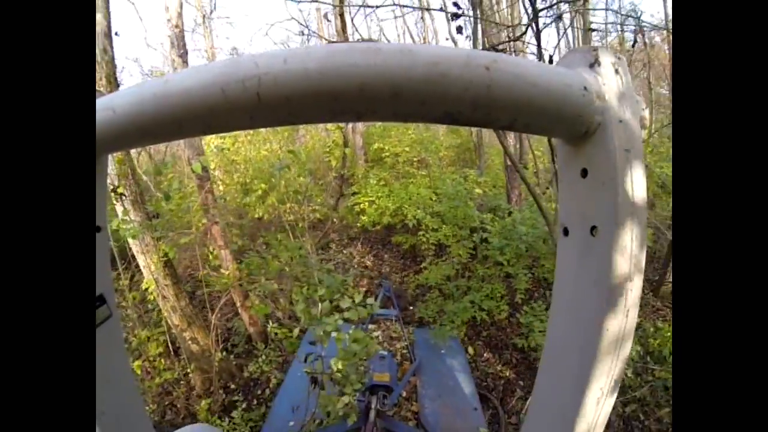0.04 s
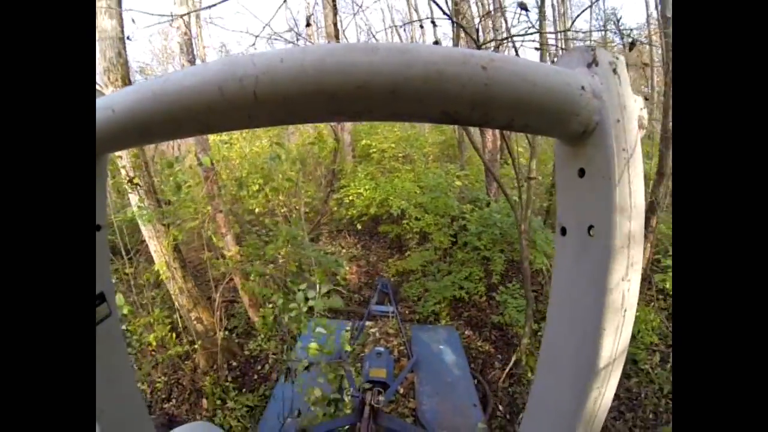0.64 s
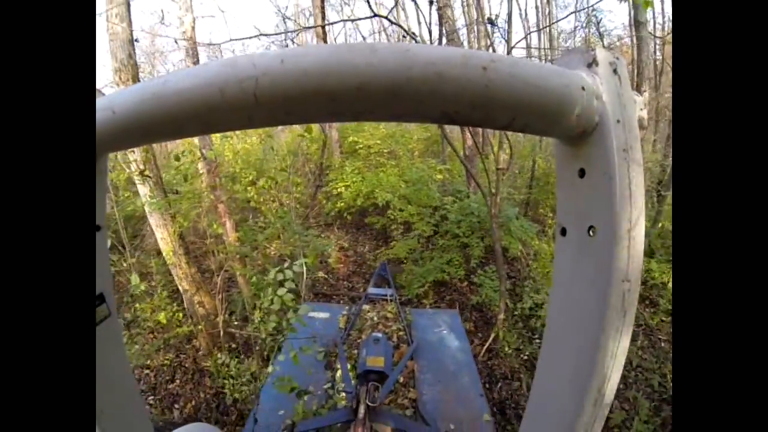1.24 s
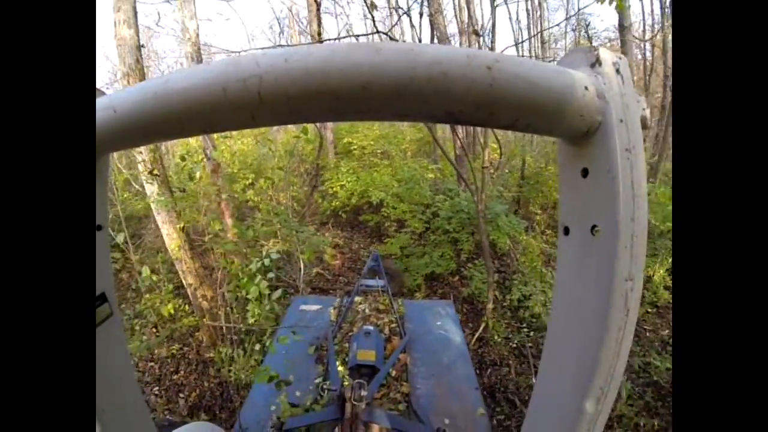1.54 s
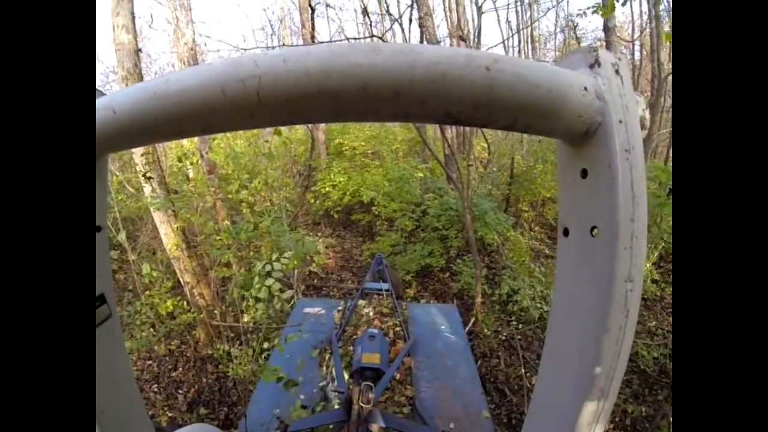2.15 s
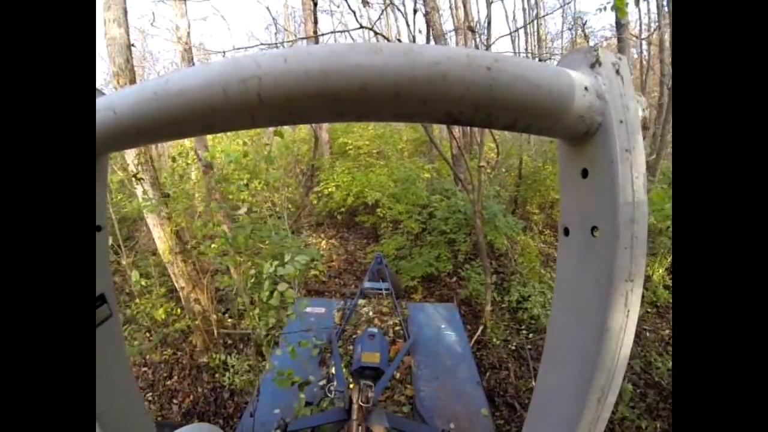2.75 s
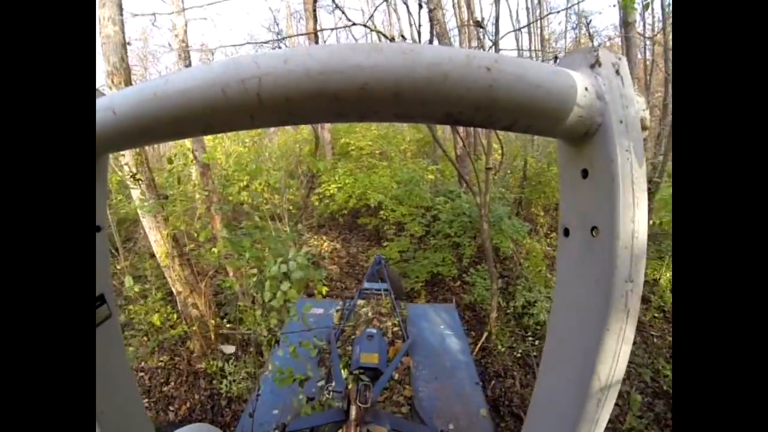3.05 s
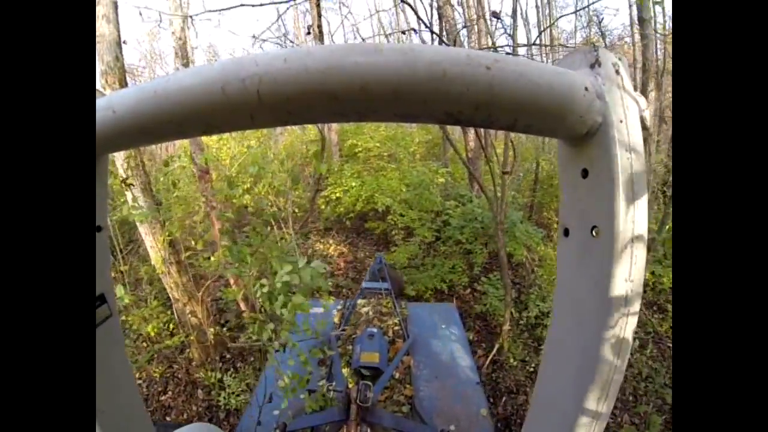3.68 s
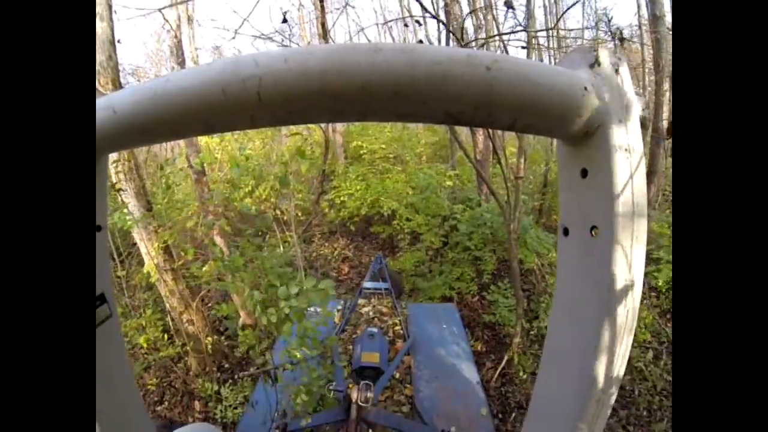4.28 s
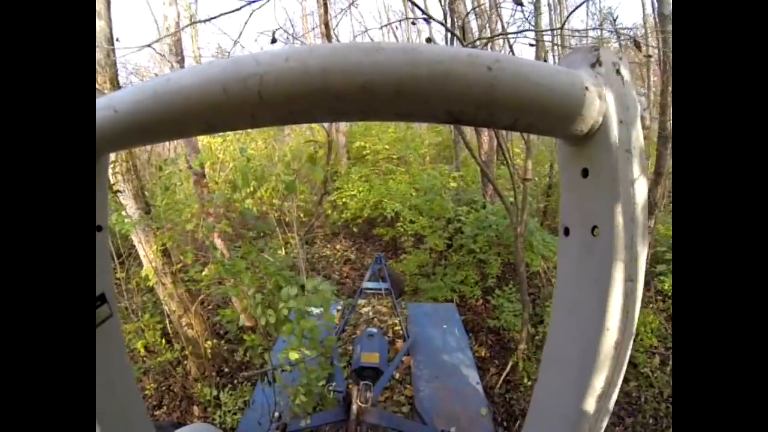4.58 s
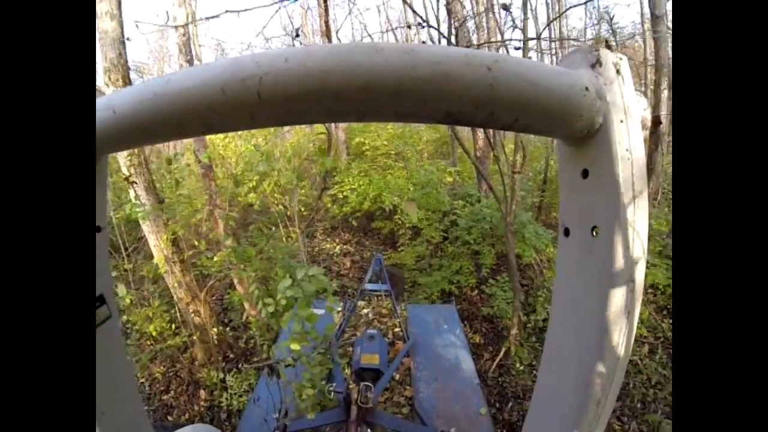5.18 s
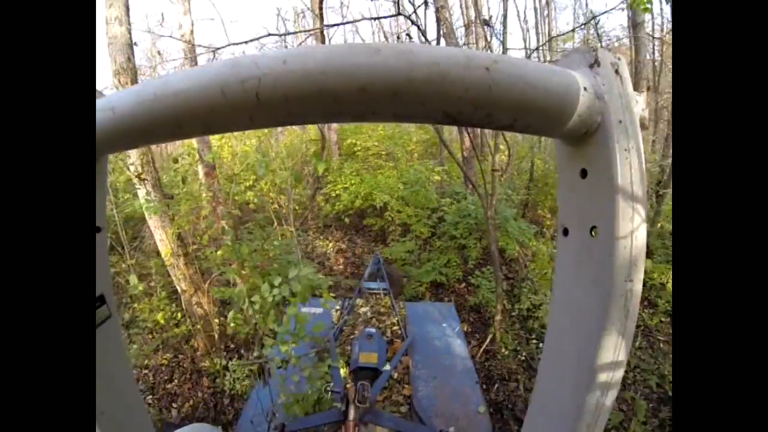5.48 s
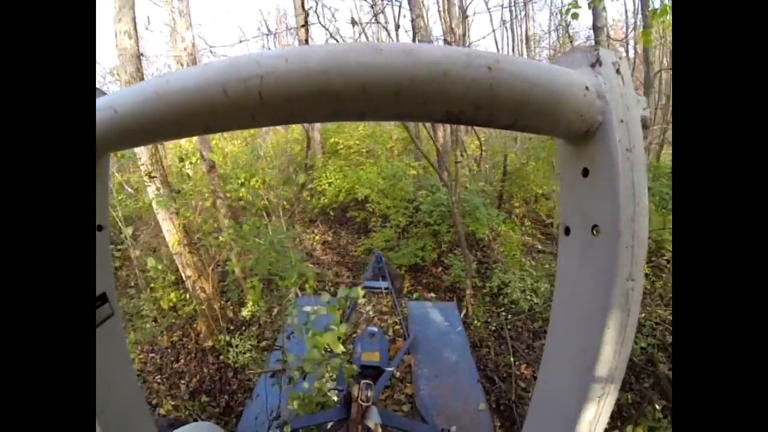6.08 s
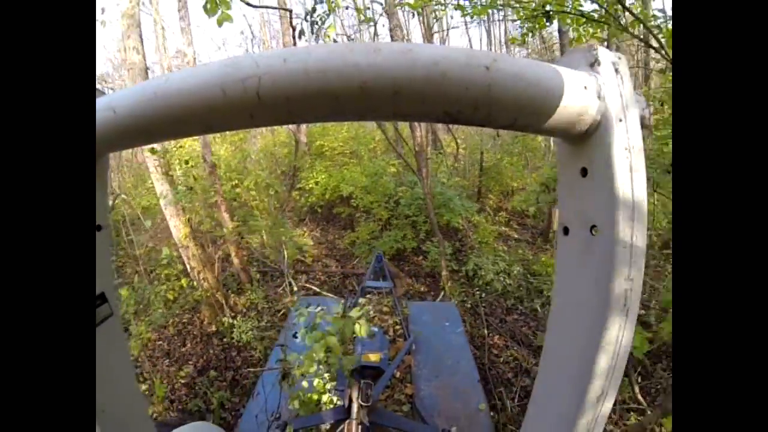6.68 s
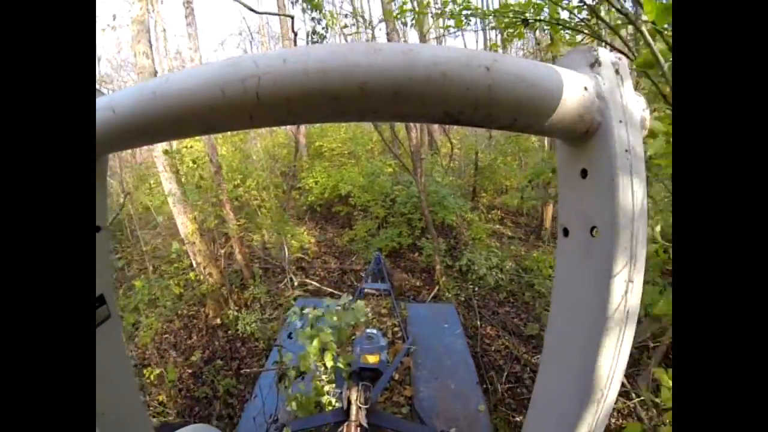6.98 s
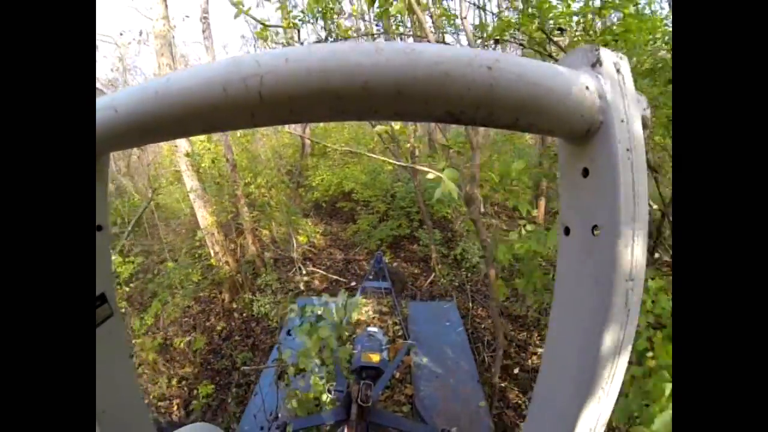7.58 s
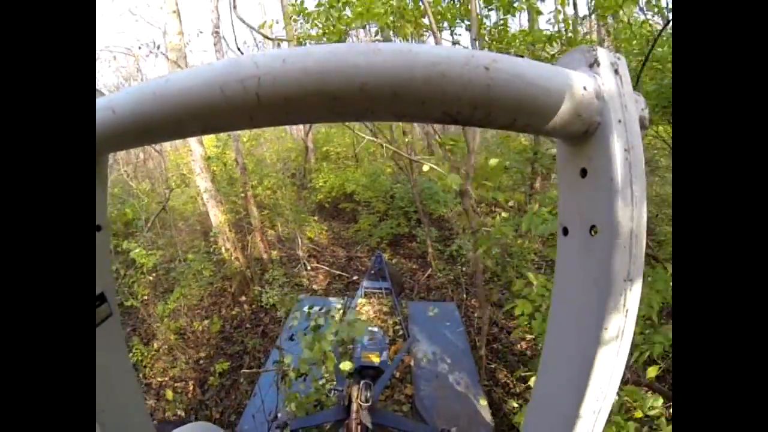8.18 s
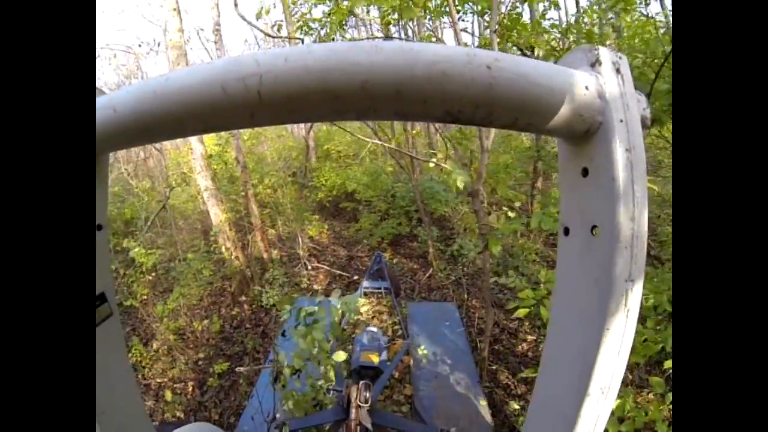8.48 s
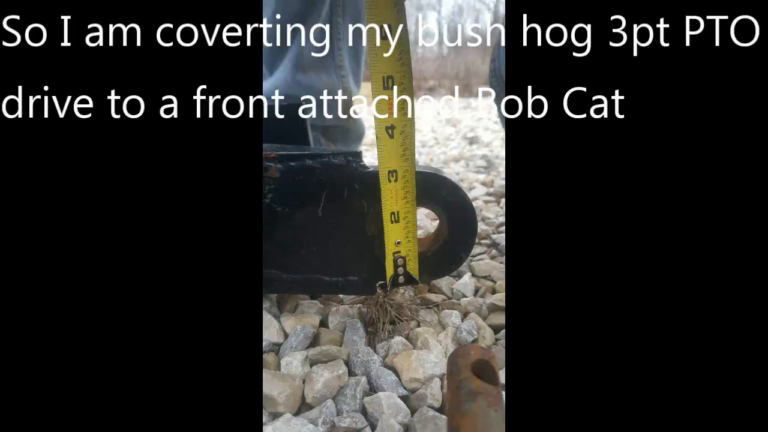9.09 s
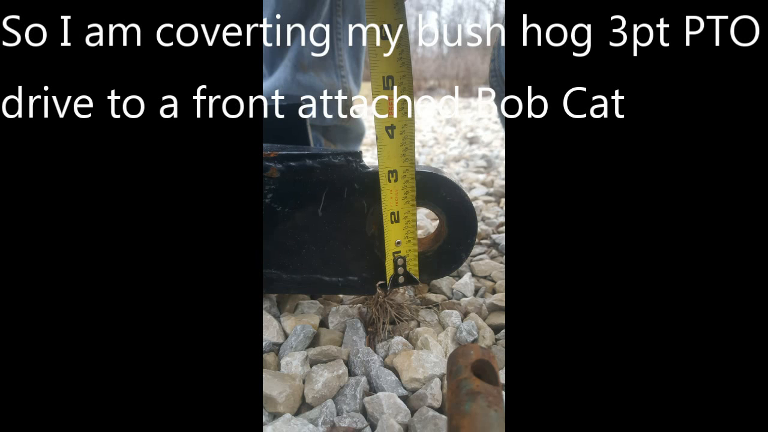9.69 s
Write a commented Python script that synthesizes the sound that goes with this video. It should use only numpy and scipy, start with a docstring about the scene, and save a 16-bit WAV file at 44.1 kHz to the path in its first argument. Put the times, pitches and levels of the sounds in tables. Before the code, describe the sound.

A rotary mower cuts and cracks through brush with steel clinks, driven by a stumbling, then faster loader engine.

```python
"""An engine pops and stumbles at low speed as a skid steer pushes a rotary mower into brush,
heard from the open cab. It picks up and runs on with frequent misfires; its fan and hydraulics hum.
The blades roar under the deck, shred stems in bursts and snap wood while loose steel clinks.
All sound stops abruptly."""
import sys
import numpy as np
from scipy import signal
from scipy.fft import rfft, irfft, next_fast_len
from scipy.io import wavfile
from scipy.ndimage import map_coordinates

SR = 44100
rng = np.random.default_rng(int(sys.argv[2]) if len(sys.argv) > 2 else 0)


def master_out(mix):
    """Clip the mix to full scale and print it as 16-bit PCM to the path in sys.argv[1]."""
    frames = np.transpose(np.atleast_2d(mix))
    ceiling = np.clip(frames, -1, 1)
    pcm = np.round(ceiling * 32767).astype(np.int16)
    wavfile.write(sys.argv[1], SR, pcm)


N = 433944
TIME = np.arange(N) / SR
CATCH_S, STOP_S = 2.383, 8.885  # engine catches; sound ends
THINNING_S = [1.27, 1.59]  # the opening thicket thins out over this span


def amp(db):
    """Decibels to gain."""
    return 10 ** (np.asarray(db) / 20)


def unit(x):
    """Scale to rms 1."""
    return x / np.sqrt(np.mean(x ** 2) + 1e-20)


def wobble(rate_hz):
    """Smooth random curve, rate_hz knots a second."""
    return map_coordinates(rng.standard_normal(int(N * rate_hz / SR) + 4), [TIME * rate_hz])


def gain(spectrum, hz):
    """Gain of (Hz, dB) points on a log axis."""
    points_hz, db = np.transpose(spectrum)
    return amp(np.interp(np.log(hz + 1), np.log(points_hz), db))


def filtered(x, response):
    """Apply a response given as a function of Hz."""
    size = next_fast_len(N + SR // 2)
    return irfft(rfft(x, size) * response(np.fft.rfftfreq(size, 1 / SR)), size)[:N]


def coloured(x, spectrum):
    """Filter by (Hz, dB) points; rms 1."""
    return unit(filtered(x, lambda hz: gain(spectrum, hz)))


def add(track, start_s, sound):
    """Mix a sound into the track."""
    start = round(start_s * SR)
    sound = sound[max(-start, 0):]
    part = track[max(start, 0):][:len(sound)]
    part += sound[:len(part)]


def crackle(rate_hz, spread_db):
    """Random clicks of uneven size; rms 1."""
    hits, size = rng.random(N) < rate_hz / SR, rng.standard_normal(N)
    return unit(hits * np.sign(size) * amp(spread_db * np.minimum(np.abs(size), 2)))


def hum(hz, drift_hz, waver_db):
    """Unsteady tone; rms 1."""
    return unit(amp(waver_db * wobble(25)) * np.sin(2 * np.pi * np.cumsum(hz + drift_hz * wobble(22)) / SR))


def swells(rows, floor_db, skew=1, steep=1):
    """Gain of (s, dB, half length s) swells; above 1, skew speeds the rise, steep squares the top."""
    t = TIME[::64]
    stretch = lambda u: np.minimum(np.maximum(-u * skew, u / skew) ** steep, 20)
    power = sum(amp(2 * db) / np.cosh(stretch((t - s) / half_s)) ** 2 for s, db, half_s in rows)
    return np.sqrt(np.interp(TIME, t, power) + amp(2 * floor_db))


def thud(width_s, boom_gain, boom_hz, t60_s, lead_s):
    """A pressure puff between two troughs, with the boom of the cab; peak at the middle."""
    t = np.arange(-(SR // 10), SR // 10) / SR
    puff = (1 - (t / width_s) ** 2) * np.exp(-.5 * (t / width_s) ** 2)
    boom = np.cos(2 * np.pi * boom_hz * t) * amp(-60 * np.abs(t) / np.where(t > 0, t60_s, lead_s))
    return (puff + boom_gain * boom) / (1 + boom_gain)


# Each row: time in seconds, engine firing rate in Hz.
FIRING_RATE = [(0, 33), (1.4, 32.8), (2.38, 39.04), (2.79, 44.02), (4.12, 43.51), (4.81, 43.91),
               (5.45, 39.81), (6.42, 42.85), (7.68, 41.39), (8.88, 42.33)]

def crankshaft():
    """Firing rate, and crank position in firings since the engine catches."""
    firing_hz = np.interp(TIME, *np.transpose(FIRING_RATE))
    crank = np.cumsum(firing_hz) / SR
    return firing_hz, crank - crank[round(CATCH_S * SR)]


# Each row: time of a hard exhaust pop in seconds, relative level in dB.
EXHAUST_POPS = [(.065, -1.5), (.316, -3), (.41, -2.5), (.44, -2), (0.505, -3), (0.532, -7.5), (0.625, -2),
                (.687, -5), (.807, -0.5), (0.93, -1), (.963, -2), (1.12, -2), (1.244, -3.5), (1.366, -4),
                (1.666, -3), (1.753, -1.5), (1.839, -.5), (1.896, -6), (1.979, 1), (2.008, -2.5),
                (2.063, 2.5), (2.088, -4), (2.144, -0.5), (2.167, -2.5), (2.33, -2)]

def pops(level_db=-3):
    """The stumbling engine fires in single hard thuds."""
    out = np.zeros(N)
    shape = thud(width_s=.0016, boom_gain=.51, boom_hz=113.7, t60_s=.04, lead_s=.029)
    for s, db in EXHAUST_POPS:
        add(out, s - len(shape) / 2 / SR, amp(db + level_db) * shape)
    return out


# Each row: middle of a run of misfires in seconds, firings missed.
MISFIRE_RUNS = [(2.81, 3), (3.13, 3), (3.91, 5), (4.9, 3), (5.45, 4), (6.86, 3), (7.31, 3), (7.65, 3),
                (8.39, 3)]

def exhaust(crank, firing_hz, puff_db=-6.4, miss_db=-21, stumble_db=-8, unlit_db=-34, scatter_db=1,
            lug_db_per_hz=.15, stumble_share=.13, miss_share=.29, clean_hz_per_s=7):
    """One puff per firing, harder under load. Few light before the catch; after it, some miss."""
    fire = np.flatnonzero(np.diff(np.floor(crank)) > 0)
    chance, scatter = rng.random(len(fire)), rng.standard_normal(len(fire))
    pickup = np.clip(np.gradient(firing_hz)[fire] * SR / clean_hz_per_s, 0, 1)
    misses = np.floor(np.cumsum(2 * chance * miss_share * (1 - pickup)))  # fewer while speeding up
    caught = crank[fire] > -.5
    lit = np.where(caught, np.diff(misses, prepend=0) == 0, chance < stumble_share)
    firings_from = lambda times_s: np.abs(TIME[fire, None] - times_s) * firing_hz[fire, None]
    run_s, run_firings = np.transpose(MISFIRE_RUNS)
    lit &= (firings_from(run_s) > run_firings / 2).all(1)
    lit &= (firings_from(np.transpose(EXHAUST_POPS)[0]) > .5).all(1)  # room for the hard pops
    firm_db = puff_db + lug_db_per_hz * (firing_hz.max() - firing_hz[fire])
    firing_db = np.where(caught, np.where(lit, firm_db, miss_db), np.where(lit, stumble_db, unlit_db))
    puffs = np.zeros(N)
    puffs[fire] = amp(firing_db + scatter_db * scatter)
    shape = thud(width_s=.0023, boom_gain=.85, boom_hz=123, t60_s=.065, lead_s=.04)
    return signal.fftconvolve(puffs, shape, "same")


# Each row: multiple of the firing rate, rms level in dB at full speed.
SHAFT_ORDERS = [(3, -28.5), (5.2, -22), (6, -32.5), (7, -40), (12, -39.5), (17.3, -43)]

def shafts(crank, firing_hz, rise_db_per_hz=.92, flutter_rad=.047, waver_db=.9, labouring_db=-9):
    """Intake, fan and pump tones follow the crank and grow as it comes up to speed."""
    tones = sum(amp(db + waver_db * wobble(13)) * np.cos(2 * np.pi * k * crank + flutter_rad * wobble(30))
                for k, db in SHAFT_ORDERS)
    slow_db = np.interp(TIME, [CATCH_S, 2.9], [labouring_db, 0])
    return np.sqrt(2) * tones * amp(rise_db_per_hz * (firing_hz - firing_hz.max()) + slow_db)


# Each row: frequency in Hz, relative level in dB.
RUMBLE_SPECTRUM = [(15, -26.5), (38, 2.5), (60, 1.5), (110, 2.5), (160, 3.5), (195, -1), (270, 0.5),
                   (340, -9), (480, -17), (900, -63)]

def chassis(firing_hz, level_db=-21, lug_db_per_hz=.17):
    """The chassis rumbles, slightly louder at low engine speed."""
    rumble = coloured(rng.standard_normal(N), RUMBLE_SPECTRUM)
    return amp(level_db + lug_db_per_hz * (firing_hz.max() - firing_hz)) * rumble


# Each row: resonance in Hz, width in Hz, relative level in dB.
DECK_MODES = [(980, 36, -6), (3410, 60, -9.5), (3650, 18, -7), (4410, 26, 0), (5000, 34, -7),
              (5600, 49, 0.5), (6018, 35, -16), (6100, 54, -17), (8748, 32, -5), (13777, 54, 1)]

def through_deck(x, spectrum):
    """Colour a sound and let the steel mower deck ring with it; rms 1."""
    def response(hz):
        ring = sum(amp(db) * 1j * hz * width_hz / (mode_hz ** 2 - hz ** 2 + 1j * hz * width_hz)
                   for mode_hz, width_hz, db in DECK_MODES)
        return gain(spectrum, hz) * (1 + ring)
    return unit(filtered(x, response))


# Each row: frequency in Hz, relative level in dB.
BLADE_SPECTRUM = [(200, -22.5), (380, -2.5), (520, 1), (640, -0.5), (800, 2.5), (1020, 2), (1300, -5),
                  (1650, -14), (2100, -15.5), (2900, -12.5), (3700, -19), (4600, -25.5), (7000, -30),
                  (13000, -49.5)]

def blades(crank, firing_hz, feed, air_db=-28.5, rise_db_per_hz=.37, chop_db=2, throb=.0505, waver_db=.82):
    """The blades throb with the engine and roar more as they speed up or chop."""
    air = rng.standard_normal(N) + .27 * crackle(rate_hz=700, spread_db=-4)
    air *= 1 + throb * np.cos(2 * np.pi * crank)
    spin_db = air_db + rise_db_per_hz * (firing_hz - firing_hz.max())
    effort = np.hypot(amp(spin_db), amp(chop_db) * feed)
    return effort * amp(waver_db * wobble(18)) * through_deck(air, BLADE_SPECTRUM)


# Each row: time a stem meets the blades in seconds, relative level in dB.
STEM_BITES = [(.03, -33.5), (.3, -44), (.92, -36), (1.29, -47.5), (1.604, -38.5), (1.69, -43), (1.92, -41),
              (2.05, -37), (2.12, -38.5), (2.51, -32), (2.59, -36.5), (2.69, -33.5), (2.77, -35.5),
              (3.3, -33), (3.573, -36.5), (3.816, -31.5), (4.06, -36.5), (4.286, -30), (4.526, -37.5),
              (4.792, -28.5), (4.981, -30), (5.396, -36.5), (5.719, -30), (6.175, -32), (6.527, -39),
              (6.727, -37.5), (6.95, -43.5), (7.276, -33.5), (7.462, -35.5), (7.638, -32.5), (7.778, -35.5),
              (7.992, -31), (8.665, -41)]

def growth_feed(thicket_db=-42, litter_db=-51, clump_db=2.2, stem_half_s=.033):
    """Growth reaching the blades: stems, bitten fast and trailing off, over clumps of small growth."""
    growth_db = np.interp(TIME, THINNING_S, [thicket_db, litter_db]) + clump_db * wobble(16)
    return swells([(s, db, stem_half_s) for s, db in STEM_BITES], growth_db, skew=1.115, steep=1.07)


def panels(x, ring_gain=.6, t60_s=.098):
    """Sheet steel adds a short ring of countless close modes."""
    t = np.arange(SR // 6) / SR
    tail = rng.standard_normal(len(t)) * amp(-60 * t / t60_s)
    return unit(x + ring_gain * signal.fftconvolve(x, tail / np.linalg.norm(tail))[:N])


# Each row: frequency in Hz, relative level in dB.
CHIP_SPECTRUM = [(200, -17), (500, 12.5), (1100, 5), (1700, -1), (2400, 3.5), (3400, 3.5), (4500, -2.5),
                 (6100, 0), (8500, -8), (10000, -16.5), (13500, -26), (15500, -47.5)]

def brush(feed, level_db=6, flutter_db=1.75):
    """Shredded growth sprays as chips against the deck."""
    grit = crackle(rate_hz=900, spread_db=5)
    chips = panels(rng.standard_normal(N) + grit)
    return amp(level_db + flutter_db * wobble(70)) * feed * through_deck(chips, CHIP_SPECTRUM)


# Each row: frequency in Hz, relative level in dB.
TWIG_SPECTRUM = [(800, -22), (2500, -0.5), (8000, 2.5), (13000, -4.5), (15500, -18.5)]

def twigs(level_db=-49, t60_s=.04):
    """Dry twigs crunch brightly in the thicket and thin out beyond it."""
    t = np.arange(SR // 20) / SR
    breaks = crackle(rate_hz=110, spread_db=3)
    power = np.abs(signal.fftconvolve(breaks ** 2, amp(-120 * t / t60_s))[:N])
    crunch = coloured(np.sqrt(power) * rng.standard_normal(N), TWIG_SPECTRUM)
    return amp(level_db + np.interp(TIME, THINNING_S, [0, -20])) * crunch


# Each row: frequency in Hz, relative level in dB.
WOOD_SPECTRUM = [(300, -11.5), (1200, 3.5), (1700, 0.5), (2400, 3), (3500, -1), (5500, -12), (12000, -42)]
# Each row: peak time in seconds, relative level in dB, half length in seconds.
SAPLING_GRINDS = [(.02, -4.5, .05), (1.1, -1.5, .11)]

def saplings(level_db=-29, flutter_db=3.9):
    """Thick stems grind under the deck, duller than the brush."""
    grind = amp(level_db + flutter_db * wobble(45)) * swells(SAPLING_GRINDS, floor_db=-46.5, steep=1.5)
    return grind * through_deck(crackle(rate_hz=3100, spread_db=3), WOOD_SPECTRUM)


# Each row: peak time in seconds, relative level in dB, half length in seconds.
PUMP_MOANS = [(.19, -19, 0.053), (.55, -16, 0.071), (.87, -18, 0.055), (1.13, -22, 0.11)]

def pump(level_db=-1.3, upper_db=-16):
    """The hydraulic pump moans on two notes while the engine labours."""
    lower = hum(hz=289.7, drift_hz=8, waver_db=2)
    upper = amp(upper_db) * hum(hz=438, drift_hz=22.4, waver_db=2)
    return amp(level_db) * swells(PUMP_MOANS, floor_db=-57, skew=1.29) * (lower + upper)


# Each row: time of the break in seconds, relative level in dB.
WOOD_SNAPS = [(.262, -8), (0.697, -8.5), (0.977, -2), (1.015, -6), (1.074, -8), (1.126, -6.5), (1.181, -4),
              (2.503, -15.5), (4.258, -16.5), (4.7634, -16), (6.6458, -19), (8.638, -15)]

def snaps(splinter_db=-11.5, splinter_t60_s=.14, crack_db=-25, crack_t60_s=.094, tear_s=.007):
    """Wood tears with one bright crack and a short run of splinters."""
    splinters, cracks = np.zeros(N), np.zeros(N)
    t = np.arange(SR // 5) / SR
    rise = 1 - np.exp(-(t / tear_s) ** 2)
    for s, db in WOOD_SNAPS:
        add(splinters, s - tear_s, amp(db + splinter_db - 60 * t / splinter_t60_s) * rise)
        add(cracks, s - tear_s, amp(db + crack_db - 60 * t / crack_t60_s) * rise)
    bright = coloured(rng.standard_normal(N), TWIG_SPECTRUM)
    return splinters * through_deck(crackle(rate_hz=5000, spread_db=-1), CHIP_SPECTRUM) + cracks * bright


# Each row: peak time in seconds, relative level in dB, half length in seconds.
DRIVE_PUSHES = [(1.21, -25, .11), (5.15, -32.5, .14), (5.9, -32.5, 0.15), (7.15, -28.5, .22),
                (8.49, -30.5, .1), (8.85, -31, 0.072)]

def drive(level_db=-1, strain_hz=22):
    """The hydraulic drive whines as the loader creeps; its pitch wanders under strain at first."""
    wander_hz = np.interp(TIME, [1.3, 1.8], [strain_hz, 0]) * wobble(70)
    whine = hum(hz=473 + wander_hz, drift_hz=6, waver_db=3)
    return amp(level_db) * swells(DRIVE_PUSHES, floor_db=-40) * whine


# Each row: frequency in Hz, relative level in dB, t60 in seconds.
STEEL_MODES = [(1438, -10.5, .04), (2250, -2, 0.11), (2690, 0.5, 0.066), (2893, 3.5, 0.16),
               (3220, -7, 0.019), (3380, 0, 0.11), (3400, 7, 0.018), (3570, -5.5, 0.055), (3630, 0, 0.19),
               (4010, -15, 0.074)]
# Each row: start in seconds, peak level in dB.
STEEL_KNOCKS = [(2.2109, -25), (2.452, -17), (3.1653, -23), (3.262, -19.5), (3.6696, -23), (5.1795, -29.5),
                (5.245, -27), (5.5268, -27), (6.0613, -20), (6.297, -20.5), (7.0963, -21.5),
                (7.1666, -14.5)]

def clinks(chatter_t60_s=.085, rattle_db=-11, rattle_t60_s=.47, detune=.012, scatter_db=3.3):
    """Each knock lands on a new spot of the loose steel, which chatters and rattles on for a moment."""
    out, t = np.zeros(N), np.arange(SR // 3) / SR
    for s, peak_db in STEEL_KNOCKS:
        ring = np.zeros(len(t))
        for hz, db, t60_s in STEEL_MODES:
            decay = amp(db + rng.normal(0, scatter_db) - 60 * t / t60_s)
            ring += decay * np.sin(2 * np.pi * hz * (1 + detune * rng.uniform(-1, 1)) * t)
        force = amp(-60 * t / chatter_t60_s) + amp(rattle_db - 60 * t / rattle_t60_s)
        knock = signal.fftconvolve(ring, force * rng.standard_normal(len(t)) ** 3)[:len(t)]
        add(out, s, amp(peak_db) * knock / np.abs(knock).max())
    return out


def squeak(peak_s=8.51, half_s=.023, level_db=-40):
    """A dry joint squeaks once."""
    envelope = np.exp(-((TIME - peak_s) / half_s) ** 2)
    return amp(level_db) * envelope * hum(hz=2760, drift_hz=29.5, waver_db=-1.5)


def scene():
    """The crank drives the exhaust, the accessories and the mower; growth drives the cutting."""
    firing_hz, crank = crankshaft()
    feed = growth_feed()
    engine = pops() + exhaust(crank, firing_hz) + shafts(crank, firing_hz) + pump() + drive()
    cutting = brush(feed) + saplings() + twigs() + snaps()
    machine = chassis(firing_hz) + blades(crank, firing_hz, feed)
    return (engine + machine + cutting + clinks() + squeak())[None]


def record(dry, ceiling=.83, fade_s=.004, top_hz=15600):
    """Round off the highest peaks, stop abruptly and cut the top treble."""
    rounded = dry[0] / (1 + np.abs(dry[0] / ceiling) ** 6) ** (1 / 6)
    gate = np.clip((STOP_S - TIME) / fade_s, 0, 1)
    return filtered(rounded * gate, lambda hz: hz < top_hz)[None]


dry = scene()
out = record(dry)
master_out(out)
```